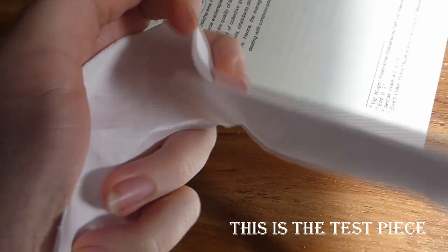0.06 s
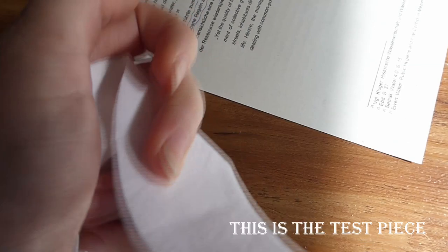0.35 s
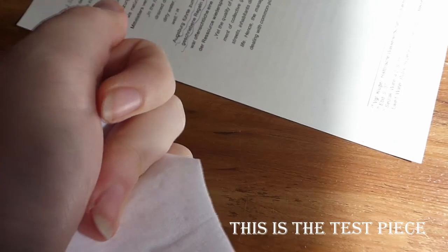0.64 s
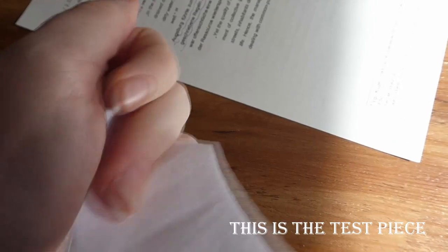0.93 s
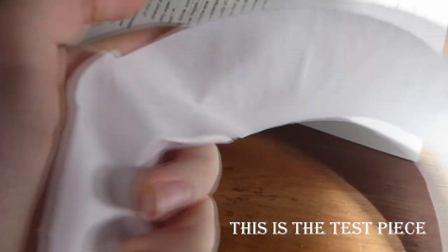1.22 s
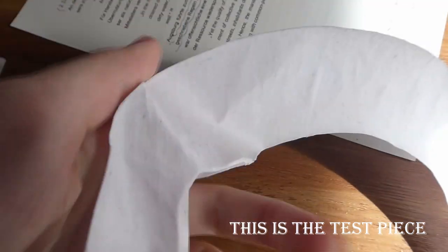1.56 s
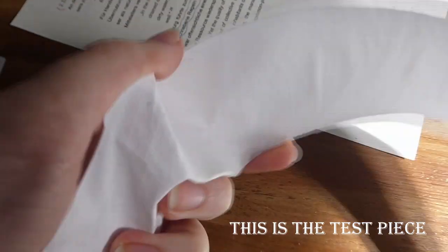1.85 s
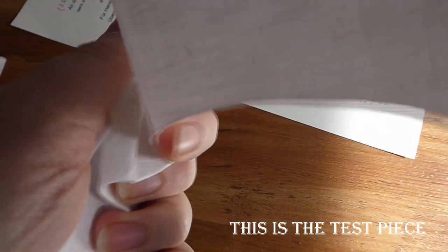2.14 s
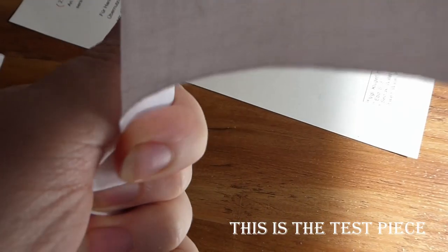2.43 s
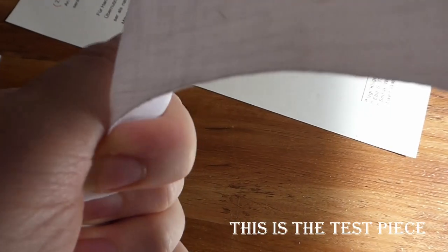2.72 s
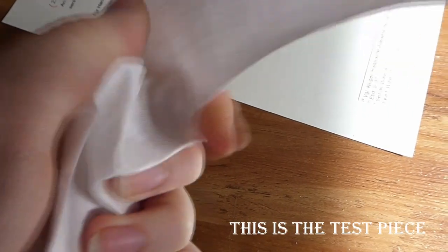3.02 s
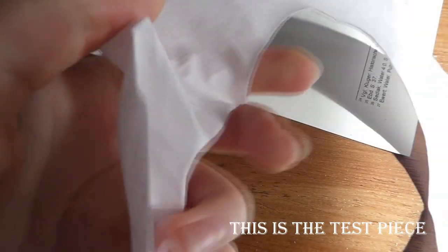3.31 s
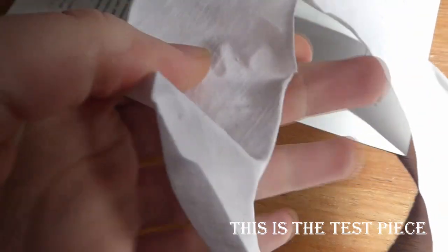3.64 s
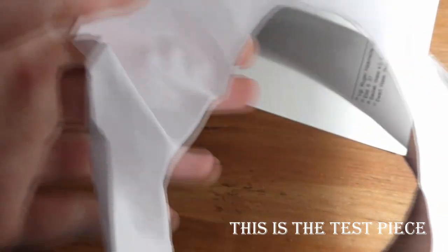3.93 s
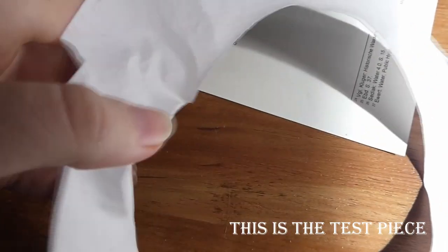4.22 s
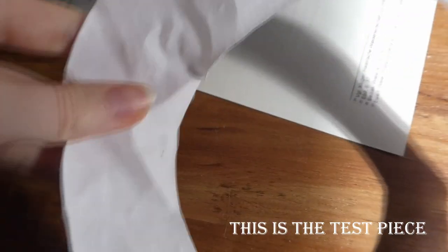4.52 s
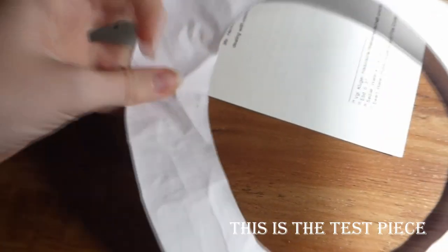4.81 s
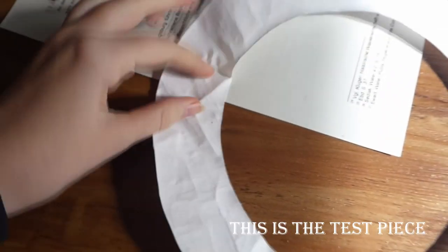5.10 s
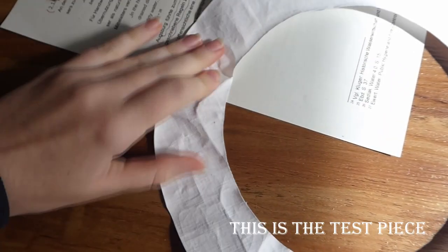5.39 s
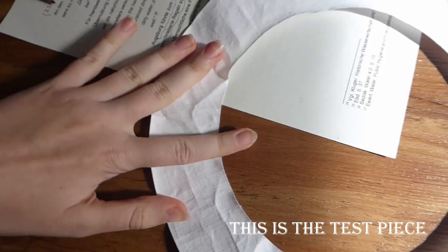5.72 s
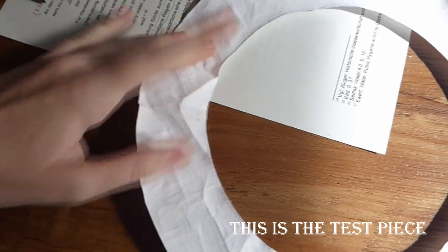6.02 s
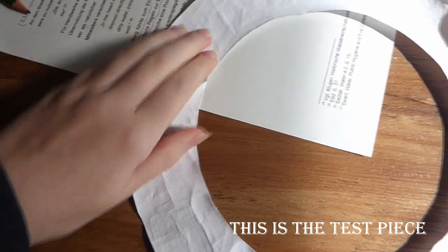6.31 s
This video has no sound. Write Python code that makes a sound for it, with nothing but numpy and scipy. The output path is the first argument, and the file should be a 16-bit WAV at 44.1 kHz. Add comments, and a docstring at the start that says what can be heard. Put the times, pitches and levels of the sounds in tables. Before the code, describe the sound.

Stiff cloth crinkles up close in a small, quiet room. It is squeezed twice, each time giving a quick, irregular run of crisp clicks and crackles, with dull little pops as the fabric flips. After one more snap as it opens, much softer strokes of skin on cloth come and go while a hand flattens it on a desk, ending with a brief brush.

```python
"""A strip of stiffened fabric, close up: a hand crumples it twice, lets it spring open and smooths it
flat on a desk. Creases buckle with sharp snaps and fine crackle, whole panels flip with soft low pops,
and skin and cloth rub in strokes and short swishes as the threads catch and slip.
Behind it are a slap off the desk top, the faint tail of a small room and quiet room tone."""
import sys
import numpy as np
from scipy import signal
from scipy.fft import rfft, irfft, next_fast_len
from scipy.io import wavfile

SR = 44100
rng = np.random.default_rng(int(sys.argv[2]) if len(sys.argv) > 2 else 0)


def unload_wav(signal):
    """Save mono or channel-first audio to the path in sys.argv[1] as 16-bit WAV at rate SR, clipped to [-1, 1]."""
    wavfile.write(
        sys.argv[1],
        SR,
        np.round(np.clip(np.atleast_2d(signal).T, -1, 1) * 32767).astype(np.int16),
    )


N = 280035
TIME = np.arange(N) / SR


def from_db(db):
    """Decibels to gain."""
    return 10 ** (np.asarray(db) / 20)


def rms_one(x):
    """Scale to unit rms."""
    return x / np.sqrt(np.mean(x ** 2) + 1e-20)


def coloured(x, points):
    """Minimum-phase EQ along a (freq_hz, gain_db) curve, so nothing sounds ahead of an attack."""
    size = next_fast_len(2 * x.shape[-1])
    hz, db = np.transpose(points)
    bin_hz = np.fft.rfftfreq(size, 1 / SR)
    log_gain = np.log(from_db(np.interp(np.log(bin_hz + 1), np.log(hz), db)))
    cepstrum = irfft(log_gain, size) * (1 + np.sign(np.fft.fftfreq(size)))
    return irfft(rfft(x, size) * np.exp(rfft(cepstrum)), size)[..., :x.shape[-1]]


def registers(x, body_edge_hz=1400, sheen_edge_hz=7000):
    """Split into the body of the panel, the crisp mids and the sheen of the fibres."""
    bands = [(body_edge_hz, "low"), ([body_edge_hz, sheen_edge_hz], "band"), (sheen_edge_hz, "high")]
    return [signal.sosfilt(signal.butter(4, edge, kind, fs=SR, output="sos"), x + 1e-18)
            for edge, kind in bands]


def resonance(x, hz, width_hz):
    """Two-pole resonance with unit gain at its peak."""
    r = np.exp(-np.pi * width_hz / SR)
    poles = [1, -2 * r * np.cos(2 * np.pi * hz / SR), r * r]
    return signal.lfilter(np.array([1, 0, -1]) * (1 - r * r) / 2, poles, x + 1e-18)


def drift(rate_hz):
    """Random wander at unit rms, through rate_hz new values a second."""
    return rms_one(np.interp(TIME * rate_hz, np.arange(N), rng.standard_normal(N)))


def panned(x, pan_db):
    """Mono to stereo by a level difference; positive is left."""
    return np.array([x * from_db(pan_db / 2), x * from_db(-pan_db / 2)])


def add(out, start_s, sound):
    """Mix in a one-shot."""
    at = int(np.clip(round(start_s * SR), 0, N - 1))
    out[..., at:at + sound.shape[-1]] += sound[..., :N - at]


# Colour of the room tone: freq_hz, gain_db
ROOM_TONE_EQ = [(25, 0), (50, -8), (90, -7), (160, -3.5), (300, -1.5), (600, -4.5), (1300, -11), (2700, -8),
                (5000, -13.5), (8000, -20.5), (10700, -13), (13000, -22), (16000, -49)]
def room_tone(level_db, side_db):
    """The air of a quiet room: a faint, wide, steady bed."""
    mid, side = coloured(rng.standard_normal((2, N)), ROOM_TONE_EQ)
    return from_db(level_db) * rms_one(mid + from_db(side_db) * side * [[1], [-1]])


# What the walls send back: freq_hz, gain_db
WALL_EQ = [(100, -17), (400, -19.5), (1200, -9), (3000, -12), (6000, -17), (11000, -13.5), (16000, -17)]
def room_tail(x, t60_s, first_echo_s, side_db):
    """The walls return a diffuse tail that opens up at the first echo and dies away."""
    t = TIME[:SR // 2]
    build_up = np.clip((t - first_echo_s) / 0.006 + 1, .15, 1)
    mid, side = rng.standard_normal((2, len(t))) * from_db(-60 * t / t60_s) * build_up
    tails = mid + from_db(side_db) * side * [[1], [-1]]
    tails = coloured(rms_one(tails) / np.sqrt(len(t)), WALL_EQ)
    return signal.fftconvolve(x.mean(axis=0)[None], tails, axes=1)[:, :N]


def desk_slap(x, echo_db, lags_s):
    """The desk top throws the sound back, a little later on one side than on the other."""
    delayed = [np.interp(TIME - lag, TIME, side, left=0) for side, lag in zip(x, lags_s)]
    return from_db(echo_db) * np.array(delayed)


# Stereo position across the cloth's spectrum: freq_hz, pan_db
CLOTH_PAN = [(150, -3), (600, -5), (1100, -6.5), (2000, 4.5), (4000, 1.6), (12000, 0.9)]
def placed(x):
    """The broad panels lie to the right of the creasing fingers, so the lows lean that way."""
    hz, pan_db = np.transpose(CLOTH_PAN)
    return np.array([coloured(side, np.column_stack([hz, sign * pan_db / 2]))
                     for side, sign in zip(x, (1, -1))])


# The hand closes on the cloth: start_s, end_s, creases_per_s
SQUEEZES = [(.41, 0.825, 123), (2.06, 2.87, 127), (3.05, 3.2, 20)]
def crease_rate(ease_s=.05, idle_per_s=1.2):
    """Small creases per second: many during a squeeze, easing in and out, hardly any otherwise."""
    return idle_per_s + sum(per_s * np.exp(-np.abs(TIME - np.clip(TIME, start, end)) / ease_s)
                            for start, end, per_s in SQUEEZES)


# Colour of rubbing cloth: freq_hz, gain_db
FRICTION_EQ = [(59, -49.5), (100, -14), (138, 2), (358, 2.5), (415, 2), (705, 0), (836, -1), (1420, -8),
               (3400, -1), (4670, -5), (5900, -7), (7940, -9), (9820, -1), (12400, -3), (16000, -36)]
def friction(grain_db, grain_hz, catch_db, catch_hz, bent_catch_db):
    """Threads catch and slip: a fine grain that comes in clumps, the more so while the cloth is bent."""
    per_s = crease_rate()
    clump_db = catch_db + bent_catch_db * per_s / per_s.max()
    grip_db = grain_db * drift(grain_hz) + clump_db * np.clip(drift(catch_hz), -2, 2)
    return coloured(rng.standard_normal(N) * from_db(grip_db), FRICTION_EQ)


# Finger strokes, body and sheen relative to the mids: start_s, end_s, level_db, body_db, sheen_db
STROKES = [(0.165, .25, -67.5, -29, -2.5), (0.36, 0.504, -56.5, -5.5, -9), (0.545, .74, -54.5, -14, -3),
           (0.756, .845, -65, -28, -0.5), (1.038, 1.105, -59.5, -8, -5), (1.139, 1.207, -55.5, -6.5, 2),
           (1.355, 1.38, -56, -8.5, -3), (1.4, 1.762, -69, -3.5, 2), (1.935, 2.037, -65.5, 0.5, -5),
           (2.17, 2.394, -62, -10, 7.5), (2.495, 2.595, -65, -31, 0), (2.612, 2.655, -55, -17, 4),
           (2.799, 2.836, -70, -22, 7), (2.972, 3.37, -66, -6, -0.5), (3.176, 3.207, -57, -11, -4),
           (3.278, 3.275, -58, 0, -6), (3.553, 3.742, -65, -10.5, 2), (3.826, 3.969, -63.5, -3, -0.5),
           (4.04, 4.213, -71, -26, -2.5), (4.33, 4.618, -68, -1, -1), (4.747, 4.882, -62.5, -3, 1.5),
           (4.916, 4.975, -58, -6.5, 0), (5.052, 5.197, -57.5, -11.5, -0.5), (5.32, 5.563, -58.5, -8, 0),
           (5.412, 5.414, -52.5, -7, 6.5), (5.603, 5.633, -52.5, -9.5, 4.5), (6.016, 6.047, -65, -2, 5.5),
           (6.31, 6.352, -51.5, -12.5, 2)]
def rub_envelopes(attack_db_per_s=512, release_db_per_s=215, resting_db=-79,
                  tail_db=-36, tail_db_per_s=202):
    """Body, mid and sheen in dB: strokes swell and fade; a short, soft noise tail follows each pop."""
    t = TIME[::64, None]
    start, end, db, body_db, sheen_db = np.transpose(STROKES)
    stroke_db = db - attack_db_per_s * np.maximum(start - t, 0)
    stroke_db -= release_db_per_s * np.maximum(t - end, 0)
    pop_s, pop_db = np.transpose(PANEL_POPS)[:2]
    pop_tails = from_db(pop_db + tail_db - tail_db_per_s * np.abs(t - pop_s)) * (t > pop_s)
    envelopes = []
    for stroke_tint_db, tail_tint_db in [(body_db, -7), (0, 0), (sheen_db, -4)]:
        power = np.sum(from_db(stroke_db + stroke_tint_db) ** 2, 1) + from_db(resting_db) ** 2
        power += np.sum((pop_tails * from_db(tail_tint_db)) ** 2, 1)
        envelopes.append(np.interp(TIME, t[:, 0], 10 * np.log10(power)))
    return envelopes


# Resonances of the strip: pitch_hz
STRIP_MODES = [760, 1600, 2600, 3350, 4300, 5250, 6100]
def sliding(gain_db, ring_db, ring_width_hz, wander_db, wander_hz, pans_db):
    """Fingers rub along the cloth; the strip's resonances come and go as the grip moves."""
    threads = friction(grain_db=2.0, grain_hz=1500, catch_db=2.5, catch_hz=150, bent_catch_db=0.5)
    rings = sum(from_db(ring_db + wander_db * drift(wander_hz)) * resonance(threads, hz, ring_width_hz)
                for hz in STRIP_MODES)
    bands = zip(registers(threads + rings), rub_envelopes(), pans_db)
    return sum(panned(from_db(gain_db + db) * rms_one(band), pan_db) for band, db, pan_db in bands)


def facet(body, crisp, sheen, hz, width_hz, broad_db, body_db, sheen_db):
    """One patch of cloth rings over the crisp mids; body and sheen are set relative to those mids."""
    ring = rms_one(resonance(body + crisp, hz, width_hz))
    mids = rms_one(ring + from_db(broad_db) * rms_one(crisp))
    return from_db(body_db) * rms_one(body) + mids + from_db(sheen_db) * rms_one(sheen)


# A quick brush has less low end than steady rubbing: freq_hz, gain_db
BRUSH_EQ = [(150, -9), (450, -2.5), (950, 1.5), (1800, 2), (12000, -2)]
# Brushes on cloth or skin: peak_s, rise_s, fall_s, level_db, ring_hz, body_db, sheen_db
SWISHES = [(0.286, 0.01, 0.011, -42.5, 2800, -26, 0.5), (0.362, 0.018, 0.014, -56, 1000, -5, -21),
           (0.382, 0.0025, 0.004, -38, 1550, -11.5, -9), (0.47, 0.023, 0.012, -47.5, 1890, -6, -24),
           (0.511, 0.003, 0.0033, -35, 3030, -17, 3.5), (1.17, 0.01, 0.0047, -44.5, 5000, -7.5, 2.5),
           (1.276, 0.003, 0.005, -50, 2640, 1.5, -2), (1.325, 0.0066, 0.0025, -51, 2780, -7.5, -2),
           (1.35, 0.0018, 0.0072, -46, 4130, 2.5, -4), (1.604, 0.0035, 0.015, -58, 3370, 1.5, -10),
           (1.746, 0.0063, 0.01, -68, 3300, 3.5, 5.5), (1.913, 0.0015, 0.0072, -42.5, 2900, -2, -4),
           (1.972, 0.0071, 0.0089, -50.5, 2540, -9, -16), (2.106, 0.014, 0.01, -50, 2400, -4, 3.5),
           (2.159, 0.0021, 0.0025, -45, 3200, -4, 5), (3.265, 0.002, 0.0051, -41, 2390, -5, -4.5),
           (3.414, 0.0018, 0.0066, -54, 5900, -9, -5.5), (3.58, 0.016, 0.039, -63.5, 2900, -24, 0),
           (3.703, 0.0045, 0.0065, -55.5, 2900, -5, 0), (3.925, 0.013, 0.015, -60.5, 3080, -0.5, 2.5),
           (4.401, 0.024, 0.014, -52, 4970, -7.5, 0.5), (4.606, 0.0046, 0.016, -62, 2400, 4, -7),
           (4.777, 0.0084, 0.038, -53.5, 1990, -1, 1), (5.087, 0.014, 0.0059, -49.5, 3160, -12, -10),
           (5.112, 0.026, 0.024, -52.5, 1050, -12, -17), (5.2, 0.021, 0.0035, -50.5, 1710, -8.5, -5.5),
           (5.355, 0.014, 0.0097, -42.5, 3470, -17, -3.5), (5.776, 0.0066, 0.0058, -57, 3430, -5, 5),
           (5.819, 0.011, 0.0067, -54.5, 6450, -10, 5.5), (5.88, 0.0041, 0.006, -57.5, 3600, -3.5, 8),
           (5.924, 0.0026, 0.0087, -66.5, 3200, 0, 3.5), (6.306, 0.0051, 0.013, -40, 4500, -23, -2)]
def swishes(gain_db, ring_width_hz, broad_db, pan_db):
    """Each quick brush swells and fades on one patch of the cloth."""
    threads = friction(grain_db=2.5, grain_hz=1700, catch_db=0.35, catch_hz=500, bent_catch_db=4.0)
    bands = np.array(registers(coloured(threads, BRUSH_EQ)))
    out = np.zeros(N)
    for peak_s, rise_s, fall_s, db, hz, body_db, sheen_db in SWISHES:
        near = slice(*np.searchsorted(TIME, [peak_s - 3 * rise_s, peak_s + 3 * fall_s]))
        t = TIME[near] - peak_s
        swell = np.exp(-.5 * (t / np.where(t < 0, rise_s, fall_s)) ** 2)
        patch = facet(*bands[:, near], hz, ring_width_hz, broad_db, body_db, sheen_db)
        out[near] += from_db(gain_db + db) * swell * patch
    return panned(out, pan_db)


# Panels that flip or are tapped: start_s, level_db, pitch_hz, t60_s
PANEL_POPS = [(0.362, -50, 263, 0.14), (0.5111, -11, 546, 0.0085), (0.516, -35, 383, 0.02),
              (0.725, -54, 195, 0.074), (1.045, -52, 440, 0.027), (1.1707, -39.5, 169, 0.019),
              (1.276, -43, 466, 0.017), (1.349, -20.5, 850, 0.0059), (1.9138, -25.5, 246, 0.02),
              (2.1015, -22.5, 290, 0.014), (2.104, -40.5, 139, 0.1), (2.177, -19.5, 558, 0.013),
              (2.1801, -28.5, 166, 0.036), (2.335, -54, 117, 0.13), (2.98, -54.5, 139, 0.12),
              (3.2662, -33, 643, 0.023), (3.267, -42.5, 188, 0.035), (4.334, -46.5, 330, 0.011),
              (5.583, -49, 173, 0.048), (6.013, -39.5, 440, 0.018), (6.098, -42, 257, 0.016),
              (6.124, -50, 400, 0.01)]
def pops(attack_s, knock_db, knock_width_ratio, pan_db):
    """A panel flips and swings, damped by the hand; its neighbours answer with a dull knock."""
    out, t = np.zeros(N), TIME[:SR // 5]
    shakes = rng.standard_normal((len(PANEL_POPS), len(t)))
    for (start_s, db, hz, t60_s), shake in zip(PANEL_POPS, shakes):
        width_hz = knock_width_ratio * hz
        knock = rms_one(resonance(resonance(shake, hz, width_hz), hz, width_hz))
        swing = np.sin(2 * np.pi * hz * t) + from_db(knock_db) * knock
        motion = from_db(db - 60 * t / t60_s) * (1 - np.exp(-t / attack_s)) * swing
        add(out, start_s, np.gradient(motion) * SR / (2 * np.pi * hz))   # pressure follows its slope
    return panned(out, pan_db)


# Colour of the crumpled sheet: freq_hz, gain_db
SHEET_EQ = [(100, -39), (200, -2.5), (600, -4.5), (1200, -12.5), (2000, -5.5), (2700, -2), (4000, -6),
            (5300, -4.5), (7800, -7), (10400, 4.5), (12500, -2), (14000, -13), (16000, -32)]
def buckle(creases, slip_s, flutter_s, flutter_db, ring_width_hz, broad_db, gain_db):
    """Each crease gives way in a split-second click; the facet around it rings and flutters out."""
    out, t = np.zeros((2, N)), TIME[:512]
    click = (1 - np.exp(-2 * t / slip_s)) * np.exp(-t / slip_s)
    flutter = from_db(flutter_db) * np.exp(-t / flutter_s)
    slips = coloured(rng.standard_normal((len(creases), len(t))) * (click + flutter), SHEET_EQ)
    to_2_ms = np.sqrt(.002 * SR / len(t))   # levels count the energy as if packed into 2 ms
    for (start_s, db, hz, body_db, sheen_db, pan_db), *bands in zip(creases, *registers(slips)):
        snap = facet(*bands, hz, ring_width_hz, broad_db, body_db, sheen_db)
        add(out, start_s, panned(from_db(db + gain_db) * to_2_ms * snap, pan_db))
    return out


def crackle(above_rub_db, spread_db, max_boost_db, body_db, sheen_spread_db, pan_db):
    """Small creases give way at random as the cloth bends, riding the level and sheen of the rubbing."""
    _, mid_db, sheen_db = rub_envelopes()
    at = np.flatnonzero(rng.random(N) < crease_rate() / SR)
    size, pitch, tint, place = rng.random((len(at), 4)).T
    db = mid_db[at] + above_rub_db + np.minimum(-spread_db * np.log(1 - size), max_boost_db)
    ring_hz = 2300 * 3 ** pitch
    tint_db = (sheen_db - mid_db)[at] + sheen_spread_db * (2 * tint - 1)
    pans_db = pan_db + 2 * (2 * place - 1)
    creases = np.column_stack([at / SR, db, ring_hz, np.full(len(at), body_db), tint_db, pans_db])
    return buckle(creases, slip_s=0.0002, flutter_s=0.0032, flutter_db=-22.5,
                  ring_width_hz=530, broad_db=-5, gain_db=-1.25)


# The big creases: start_s, level_db, ring_hz, body_db, sheen_db, pan_db
BIG_CREASES = [(0.1164, -64.5, 2390, -21, 9, 2.5), (0.159, -56.5, 2480, -19, -4, 2),
               (0.2872, -35, 4300, -11, -1.5, 1.5), (0.3266, -40, 2400, -21, -6, 1),
               (0.412, -39, 2380, -25, -7, 2), (0.428, -39.5, 2480, -13, -18, 1),
               (0.4758, -36, 2110, -19, -24, 3), (0.5008, -39, 5300, -32, 5, 3),
               (0.5118, -22.5, 3060, -6, -6, 1), (0.5574, -42, 4570, -26, -22, 4),
               (0.6459, -37, 3100, -37, -5, 4), (0.6675, -36.5, 2670, -33, -1, -3),
               (0.6806, -35, 4200, -38, 1, 4.5), (0.7103, -42, 2800, -17.5, -11, 4),
               (0.7202, -35, 2840, -20, -1, 2.5), (0.7432, -43, 5160, -33, 8.5, 4),
               (0.8211, -41, 5100, -38, -2, 2), (0.843, -46, 2990, -38, 4, 2),
               (0.8658, -59, 2700, -33, 10, 1), (0.9061, -49.5, 2430, -33, -2, 2),
               (1.171, -24.5, 4800, -17.5, -8, 1.5), (1.2783, -42, 2560, -14, -17, 2),
               (1.3484, -26, 3600, -26, 0, -7), (1.4449, -45, 3260, -12.5, -20, -8),
               (1.9136, -35, 3070, -9.5, -1, 0), (1.9752, -52.5, 2480, -21, 14, 1),
               (1.9941, -60, 6000, -22, 23.5, 2), (2.0521, -49, 2500, -11, -16, 1),
               (2.0871, -44.5, 2920, -4, 4.5, 1), (2.1576, -41, 3000, -8, -13, 2),
               (2.1667, -36.5, 3400, -5, 0, 3), (2.1864, -51, 3700, 7.5, 17.5, 2),
               (2.2398, -42, 6900, -30, 6.5, 1), (2.2901, -26.5, 6730, -25, -23, 1.5),
               (2.2987, -33, 2640, -22, 1.5, 1.5), (2.3856, -39.5, 6700, -34, 8.5, 6),
               (2.3993, -36.5, 6700, -38, 9, -1.5), (2.4428, -23, 3180, -26, -17, 1),
               (2.4646, -42.5, 6160, -37, -2, -1), (2.4977, -47.5, 6540, -23, 0, 1),
               (2.5986, -43, 3960, -31, 4, 2), (2.6393, -33.5, 2500, -36, -15, 1),
               (2.652, -33.5, 6500, -12.5, -1, 1), (2.663, -39, 4800, -15, 5.5, -4),
               (2.7016, -36.5, 5360, -37, -2, -2.5), (2.7233, -41.5, 6200, -15, 5.5, 1.5),
               (2.8329, -52.5, 3430, -26, 8, 3), (2.8734, -56.5, 5200, -29, 7, -2),
               (3.1925, -39, 3500, -13, -9.5, 2), (3.2639, -30.5, 3000, -20, -9, -7.5),
               (5.0967, -54, 2960, -12, -2, 13)]
def snaps():
    """Big creases buckle one by one: the sharp accents of the crumple."""
    return buckle(BIG_CREASES, slip_s=0.00024, flutter_s=0.002, flutter_db=-20.5,
                  ring_width_hz=570, broad_db=0.0, gain_db=-1.3)


def scene():
    """The cloth up front, with desk slap, room tail and room tone behind it."""
    cloth = snaps()
    cloth += crackle(above_rub_db=5.0, spread_db=4.5, max_boost_db=8, body_db=-23,
                     sheen_spread_db=7.5, pan_db=1.5)
    cloth += sliding(gain_db=-2.0, ring_db=-11, ring_width_hz=400, wander_db=4, wander_hz=8.4,
                     pans_db=(-1.5, 0.1, -0.3))
    cloth += swishes(gain_db=-1.05, ring_width_hz=690, broad_db=-0.5, pan_db=0.9)
    cloth += pops(attack_s=0.0009, knock_db=-13.0, knock_width_ratio=0.86, pan_db=2.5)
    cloth = placed(cloth)
    slap = desk_slap(cloth, echo_db=-24.5, lags_s=(0.0014, 0.0021))
    tail = room_tail(cloth, t60_s=0.14, first_echo_s=0.012, side_db=-1)
    return cloth + slap + tail + room_tone(level_db=-68, side_db=1)


def record(dry):
    """The microphone sheds the deep bass; a steep high cut takes off the very top."""
    low_cut_hz, high_cut_hz = 85, 16200
    thin = signal.sosfilt(signal.butter(2, low_cut_hz, "high", fs=SR, output="sos"), dry)
    return signal.sosfilt(signal.ellip(10, .1, 80, high_cut_hz, fs=SR, output="sos"), thin)


dry = scene()
out = record(dry)
unload_wav(out)
```